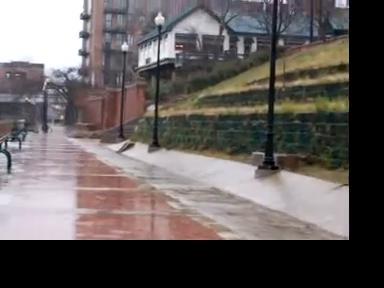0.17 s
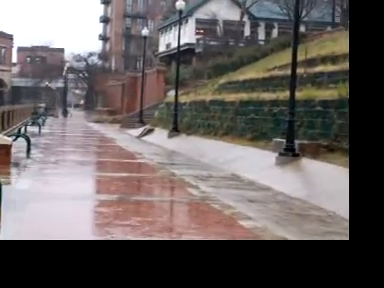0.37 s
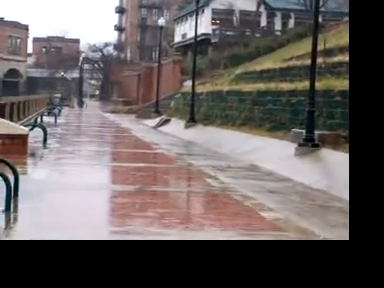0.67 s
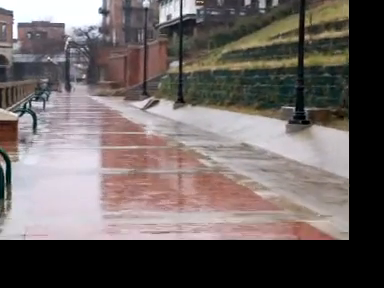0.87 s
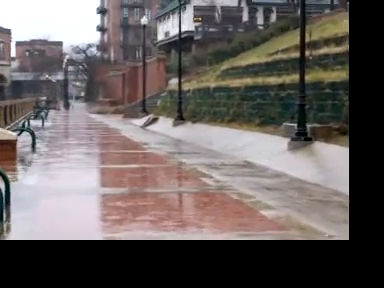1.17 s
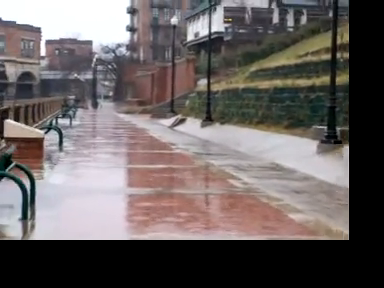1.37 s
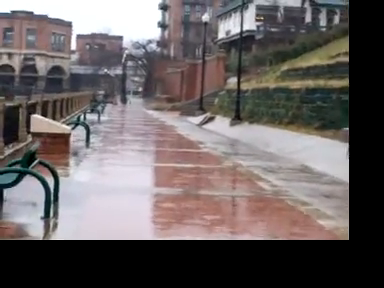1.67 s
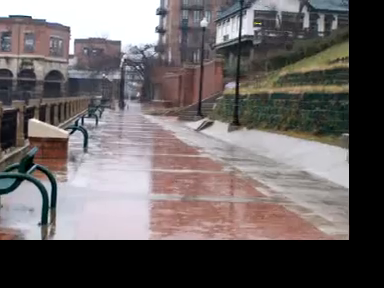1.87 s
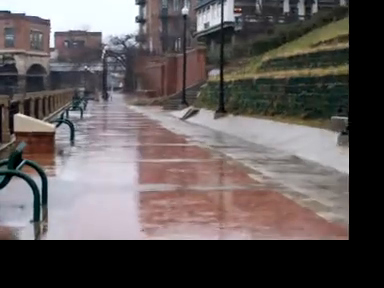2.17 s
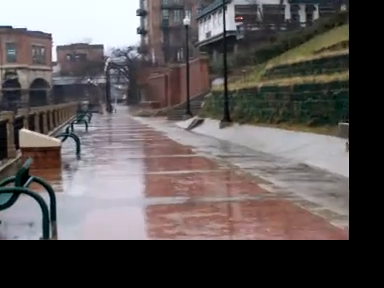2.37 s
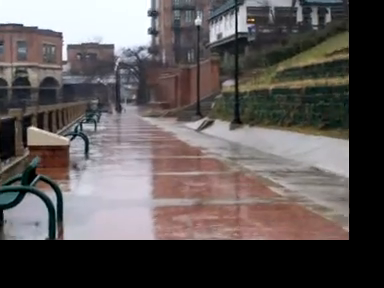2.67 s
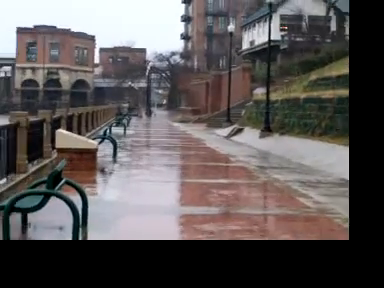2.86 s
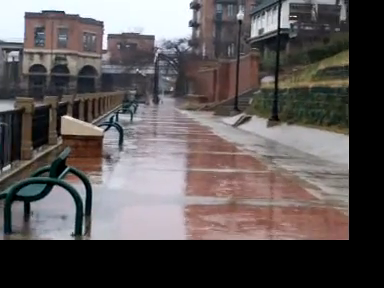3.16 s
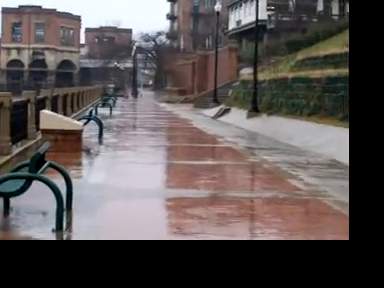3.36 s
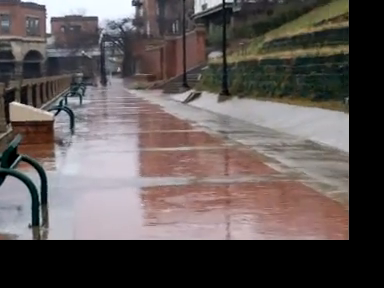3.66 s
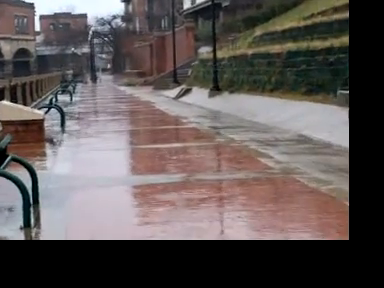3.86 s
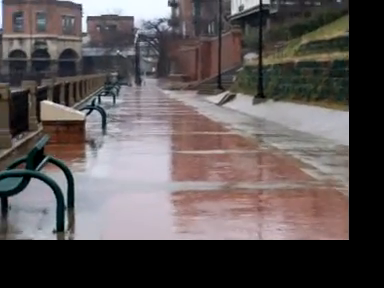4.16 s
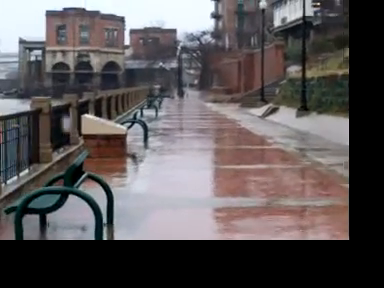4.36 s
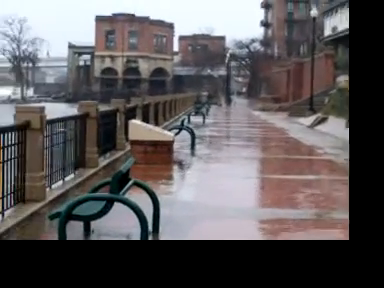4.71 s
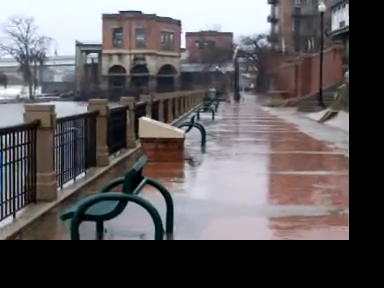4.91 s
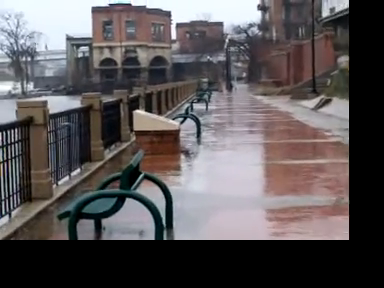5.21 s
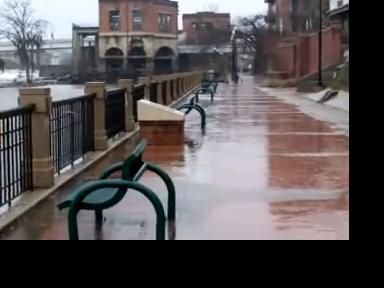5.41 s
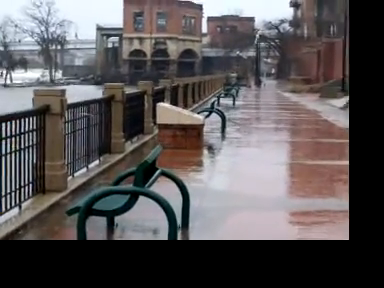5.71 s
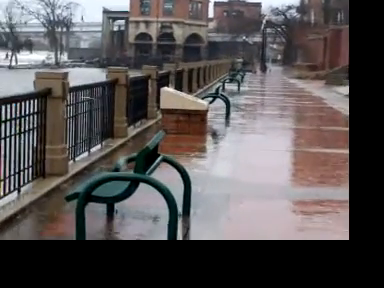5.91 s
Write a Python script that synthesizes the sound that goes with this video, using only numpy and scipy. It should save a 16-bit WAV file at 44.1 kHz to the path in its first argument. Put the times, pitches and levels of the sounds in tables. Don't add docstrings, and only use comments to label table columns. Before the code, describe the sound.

Steady rain on a wet riverside walkway, heard close at a small hand-held microphone. Bright individual drops snap and ring briefly over dense patter and a smooth distant hiss. Wind buffets and pops on the microphone in the first second, eases to brief low thumps, then bursts hard again after about five seconds, making the rain pump slightly in level.

```python
import sys
import numpy as np
from scipy import signal
from scipy.fft import rfft, irfft
from scipy.io import wavfile
from scipy.ndimage import uniform_filter1d

SR = 44100
rng = np.random.default_rng(int(sys.argv[2]) if len(sys.argv) > 2 else 0)


def natural_amplitude(level_db):
    exponent = np.asarray(level_db, float) / 20
    return 10 ** exponent


def to_wav(sig):
    pcm = np.clip(np.atleast_2d(sig), -1, 1) * 32767
    pcm = np.round(pcm).astype(np.int16)
    wavfile.write(sys.argv[1], SR, pcm.T)


N = 266716

# start_s, peak_db, ring_hz
LARGE_DROPS = [(0.0209, -3.5, 4020), (0.0634, -8, 3170), (0.1415, -8, 3360), (0.617, -5.5, 3550),
               (0.7128, -4.5, 2830), (0.8122, -6.5, 3180), (1.091, -4, 3180), (1.22, -5, 3070),
               (1.2396, -4.5, 4770), (1.4464, -6, 2970), (2.1397, -4.5, 4100), (2.5415, -1.5, 3270),
               (2.5659, -5, 2600), (2.9814, -2.5, 2740), (3.0054, 0, 3030), (3.1615, -7, 2950),
               (3.3325, -9, 4160), (3.5679, -7.5, 2550), (3.7909, -3, 3190), (3.8602, -7, 2850),
               (4.1495, -5.5, 3960), (4.256, -2, 4350), (4.2675, -8, 3100), (4.4422, -5.5, 2960),
               (4.4674, -5, 3700), (4.9396, -4, 3750), (5.3101, -5, 3060), (5.4535, -3.5, 2470),
               (5.7268, -7, 2330), (5.8617, -4, 3800)]
# start_s, peak_db, ring_hz, overload_db
OVERLOAD_DROPS = [(0.1317, -3, 3790, -16.5), (1.1858, -5, 3100, -25.5), (1.731, -6.5, 2940, -19.5),
                  (1.8563, -11, 3720, -45), (1.8943, -4, 3140, -24), (2.121, 0.5, 3430, -27.5),
                  (2.373, -5.5, 3420, -30), (2.4773, -6, 4020, -25), (2.7299, -0.5, 3660, -22.5),
                  (2.8965, -6, 4230, -37.5), (3.1774, -2, 4300, -15), (3.37, -1.5, 4750, -27),
                  (4.5807, -8.5, 4200, -16.5), (4.7713, -7, 2590, -36), (5.0023, -5, 3970, -29)]


def near_drops():
    drops = [*LARGE_DROPS, *[row[:-1] for row in OVERLOAD_DROPS], *middling_drops()]
    out = np.zeros(N + 400)
    luck = rng.random((len(drops), 7))
    for (start_s, peak_db, ring_hz), chance in zip(drops, luck):
        at = round((start_s - 0.0002) * SR)
        knock_db = 7.0 - 2.5 * chance[6] - 4.4 * (ring_hz / 1000 - 2.5)
        drop = snap(1.017 * ring_hz, knock_db, chance, wet=0.8)
        out[at:at + 400] += natural_amplitude(peak_db + 3.0) * drop[:N + 400 - at]
    return out[:N]


def middling_drops():
    count, top_db, range_db = 220, -8.5, 10.5
    center_hz, spread_octaves = 3190, 0.78
    when, size, tone = rng.random((count, 3)).T
    start_s = 0.005 + when * (N / SR - 0.02)
    rain_db = curve(RAIN_LEVEL, column=1)
    swell_db = rain_db[(start_s * SR).astype(int)] - np.mean(rain_db)
    peak_db = top_db - range_db * size + swell_db
    ring_hz = center_hz * 2 ** (spread_octaves * (2 * tone - 1))
    return np.transpose([start_s, peak_db, ring_hz])


def snap(hz, knock_db, luck, wet):
    cycles = wet * (4.5 + 7 * luck[0])
    knock = ring(1300 * (0.7 + 0.8 * luck[1]), 3.5)
    tick = ring(5870, 1.96)
    first = ring(hz, cycles) + natural_amplitude(knock_db) * knock + natural_amplitude(-12.0) * tick
    crown = ring(hz * (0.6 + 0.9 * luck[3]), cycles)
    crown_at = round((0.00025 + 0.0006 * luck[2]) * SR)
    droplet = ring(hz * (0.49 + 0.8 * luck[5]), cycles)
    droplet_at = round((0.0008 + 0.002 * luck[4]) * SR)
    sound = first.copy()
    sound[crown_at:] += natural_amplitude(-3 - 10 * luck[3]) * crown[:-crown_at]
    sound[droplet_at:] += natural_amplitude(-6.5 - 13 * luck[5]) * droplet[:-droplet_at]
    return sound / abs(first).max()


def ring(hz, cycles):
    t_s = np.arange(400) / SR
    return -np.sin(2 * np.pi * hz * t_s) * natural_amplitude(-60 * t_s * hz / cycles)


# start_s, level_db
RAIN_LEVEL = [(0.0, -26), (0.57, -27.5), (1.14, -26.5), (2.34, -26), (2.81, -25), (3.1, -27.5), (3.6, -27),
              (3.79, -25.5), (4.46, -27.5), (4.78, -26.5), (5.42, -29), (5.66, -30.5), (5.79, -28.5),
              (6.05, -29.5)]
# freq_hz, gain_db
MIC_RESPONSE = [(100, -17), (500, -7.5), (1500, -2), (3000, 5), (5500, 8), (6800, 5.5), (7800, -4),
                (8600, -21.5), (9300, -97.5), (22000, -108.5)]


def rain():
    close = natural_amplitude(-1.0) * patter(per_s=260, spread_db=6.0, most=1.35)
    farther = natural_amplitude(-6.5) * patter(per_s=1800, spread_db=7.5, most=4.6)
    bed = causal(close + farther, MIC_RESPONSE) + far_hiss()
    level_db = curve(RAIN_LEVEL, column=1) + 0.56 * wobble(0.063)
    return natural_amplitude(level_db) * bed + causal(near_drops(), MIC_RESPONSE)


def patter(per_s, spread_db, most):
    count = 18
    rate_per_s = per_s * natural_amplitude(2.6 * wobble(0.008))
    size = natural_amplitude(spread_db * np.minimum(rng.exponential(1, N), most))
    hits = size * (rng.random(N) < rate_per_s / SR)
    kind = rng.integers(0, count, N)
    luck = rng.random((count, 7))
    out = np.zeros(N)
    for k, hz in enumerate(np.geomspace(1600, 7400, count)):
        drop = snap(hz, -3.5 - 12 * luck[k, 6], luck[k], wet=0.4)
        out += signal.oaconvolve(hits * (kind == k), drop)[:N]
    return evened(out)


# freq_hz, level_db_per_hz
HISS_SPECTRUM = [(88, -33), (150, 2.5), (210, -12), (406, -6), (598, 3.5), (894, -5.5), (1570, -2.5),
                 (1970, -2.5), (2380, -0.5), (3920, -6.5), (5770, -5), (7000, -14), (9100, -34.5),
                 (15400, -120)]


def far_hiss():
    return natural_amplitude(-6.0) * noise(HISS_SPECTRUM, -100) * natural_amplitude(1.07 * wobble(0.013))


# start_s, pop_db, width_ms, flutter_db, gust_s
POP_EDDIES = [(.139, -12, 1.9, -14.5, 0.022), (0.322, -21, 0.93, -18.5, 0.015),
              (.487, -3, 0.82, -15.5, 0.036), (0.695, 0, 1.7, -16, 0.023), (3.968, -14, 1.3, -18, .016),
              (5.102, -2, 0.58, -14, 0.04), (5.131, -9, 0.74, -24, 0.062), (5.199, -6, 1.5, -16, 0.01),
              (5.251, 3, 1.6, -13, 0.014), (5.499, -10, 0.59, -13, 0.026), (5.527, 1, .6, -13, 0.026),
              (5.671, -9, 0.64, -13, 0.017), (5.878, -5.5, .6, -18.5, 0.021), (5.976, -3, 0.27, -12, 0.013)]


def pops():
    out = np.zeros(N)
    t_ms = np.arange(-300, 300) * 1000 / SR
    for start_s, pop_db, width_ms, _, _ in POP_EDDIES:
        u = abs(t_ms) / max(width_ms, 0.2)
        at = round(start_s * SR) - 300
        out[at:at + 600] -= natural_amplitude(pop_db) * (1 - u) * np.exp(-u) * np.hanning(600)
    return out


# freq_hz, level_db_per_hz
BUFFET_SPECTRUM = [(8.8, -46), (15, 0.5), (44, 3), (80, 2.5), (107, 3.5), (209, -9.5), (300, -16),
                   (390, -16.5), (660, -120)]
# freq_hz, level_db_per_hz
FLUTTER_SPECTRUM = [(80, -29), (160, 4.5), (250, 1), (400, -7), (700, -21), (1400, -45.5), (3000, -58)]
# freq_hz, level_db_per_hz
RUSTLE_SPECTRUM = [(300, -25), (450, 2), (800, -5), (1300, -17.5), (2500, -39)]


def wind():
    spikes = wobble(0.0043)
    buffet = levelled(noise(BUFFET_SPECTRUM, -69.5), 0.036)
    flutter = levelled(noise(FLUTTER_SPECTRUM, -90) * natural_amplitude(1.5 * spikes), 0.03)
    rustle = levelled(noise(RUSTLE_SPECTRUM, -84.5) * natural_amplitude(4.1 * spikes), 0.048)
    stir = gusting(column=2)
    push = gusting(column=1) * buffet + stir * flutter
    suction = 0.45 * (push ** 2 - uniform_filter1d(push ** 2, 1500))
    return push - suction + natural_amplitude(-3.5) * stir ** 1.71 * rustle


# start_s, buffet_db, flutter_db, length_s
PLAIN_GUSTS = [(0.1, -21.5, -25, 0.048), (0.176, -12, -12, 0.017), (0.25, -30, -25, 0.023),
               (0.409, -28, -19.5, 0.042), (0.526, -22, -14, 0.014), (0.632, -32, -17.5, 0.059),
               (0.76, -29, -23, 0.054), (0.974, -16.5, -32, 0.0093), (1.026, -15, -39, 0.017),
               (1.202, -30, -25, 0.0097), (1.284, -13, -29, 0.0086), (1.808, -17, -37, 0.023),
               (1.993, -16, -44, 0.016), (2.056, -16.5, -32, 0.012), (2.122, -16, -22.5, 0.017),
               (2.194, -17.5, -22.5, 0.0081), (2.389, -22, -43, 0.012), (3.122, -14, -22.5, 0.01),
               (3.419, -20, -23, 0.023), (3.721, -23, -38, 0.022), (3.823, -39, -20, 0.041),
               (4.004, -19, -28, 0.011), (4.145, -20.5, -24, 0.033), (4.575, -21, -47, 0.018),
               (4.872, -18, -37, 0.011), (4.984, -28, -21.5, 0.021), (5.329, -9, -17, 0.037),
               (5.565, -38, -12.5, 0.019), (5.75, -36, -22, 0.072), (5.932, -24, -19, 0.0099)]
# start_s, strength_db
BREEZE = [(0.0, -29), (0.15, -31), (0.29, -26.5), (0.6, -25.5), (0.77, -33), (1.01, -36.5), (1.16, -27),
          (1.48, -33.5), (2.16, -26.5), (2.54, -30), (2.81, -34.5), (2.96, -35), (3.87, -27.5), (3.99, -26),
          (4.19, -33), (5.04, -29.5), (5.27, -22.5), (6.05, -23.5)]


def gusting(column):
    t_s = np.arange(0, N, 64) / SR
    pop_gusts = [(start_s, db - 1.5, db, length_s) for start_s, _, _, db, length_s in POP_EDDIES]
    bells = np.zeros(len(t_s))
    for gust in [*PLAIN_GUSTS, *pop_gusts]:
        u = (t_s - gust[0]) / max(gust[3], 0.012)
        bells += natural_amplitude(2 * gust[column]) * np.exp(-np.log(16) * u ** 2)
    breeze_db = curve(BREEZE, column=1)
    if column == 1:
        breeze_db = breeze_db + 2
    else:
        breeze_db = -33.5 + 0.81 * (breeze_db - breeze_db.mean())
    breeze_power = natural_amplitude(2.137 * (breeze_db + 3.5 * wobble(0.015)))
    return np.sqrt(breeze_power + np.interp(np.arange(N) / SR, t_s, bells))


def levelled(x, seconds):
    span = round(seconds * SR)
    power = uniform_filter1d(uniform_filter1d(x ** 2, span), span)
    return x / np.sqrt(power + 0.053)


def noise(points, beyond_db):
    hz = np.fft.rfftfreq(N, 1 / SR)
    db = np.where(hz > points[-1][0], beyond_db, read(points, hz))
    return evened(irfft(rfft(rng.standard_normal(N)) * natural_amplitude(db), N))


def causal(x, points):
    log_gain = np.log(natural_amplitude(read(points, abs(np.fft.fftfreq(4096, 1 / SR)))))
    taps = np.fft.ifft(np.exp(np.conj(signal.hilbert(log_gain)))).real[:1024]
    return signal.oaconvolve(x, taps)[:N]


def wobble(seconds):
    span = max(round(seconds * SR), 2)
    return evened(uniform_filter1d(uniform_filter1d(rng.standard_normal(N), span), span))


def evened(x):
    return x / np.sqrt(np.mean(x ** 2) + 1e-20)


def read(points, hz):
    f_hz, value = np.transpose(points)
    return np.interp(np.log(hz + 1), np.log(f_hz + 1), value)


def curve(rows, column):
    rows = np.array(rows)
    return np.interp(np.arange(N) / SR, rows[:, 0], rows[:, column])


def scene():
    return (rain() + wind() + pops())[None]


def roll_off(x):
    return signal.sosfilt(signal.butter(12, 15900, fs=SR, output="sos"), x)


def record(dry):
    peak_db = 20 * np.log10(abs(dry[0]) + 1e-6)
    fall_db = np.arange(N) * 60.0 / SR
    held_db = np.maximum.accumulate(peak_db + fall_db) - fall_db
    over_db = np.maximum(held_db + 6.5, 0)
    ducked = dry / natural_amplitude(0.43 * uniform_filter1d(over_db, 88, origin=43))
    squeezed = 0.68 * np.tanh(ducked / 0.68)
    lowpass = signal.firwin(301, 8800, window=("kaiser", 11), fs=SR)
    out = signal.oaconvolve(squeezed, lowpass[None], "same")
    out *= np.minimum(np.arange(N, 0, -1) / 150, 1)
    for start_s, _, _, overload_db in OVERLOAD_DROPS:
        out[:, round(start_s * SR) + 5] += natural_amplitude(overload_db)
    return roll_off(out)


dry = scene()
out = record(dry)
to_wav(out)
```